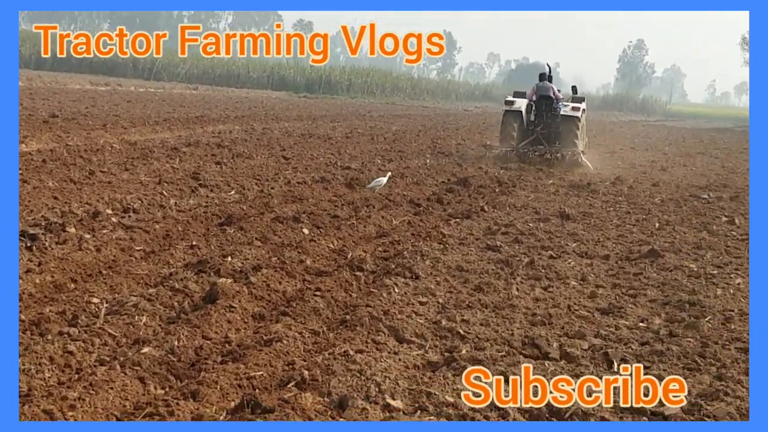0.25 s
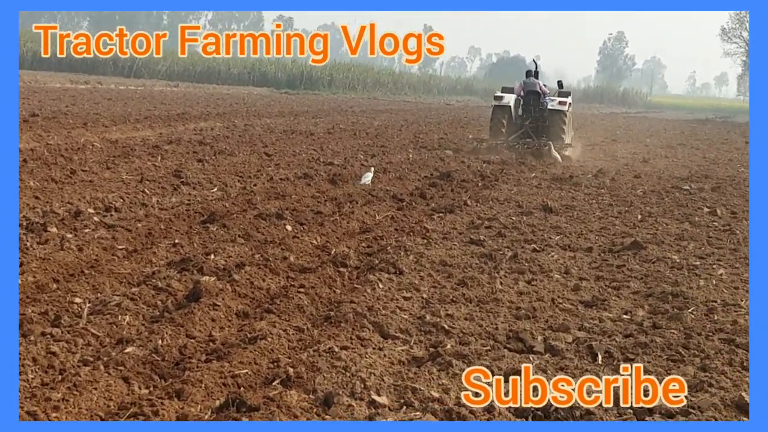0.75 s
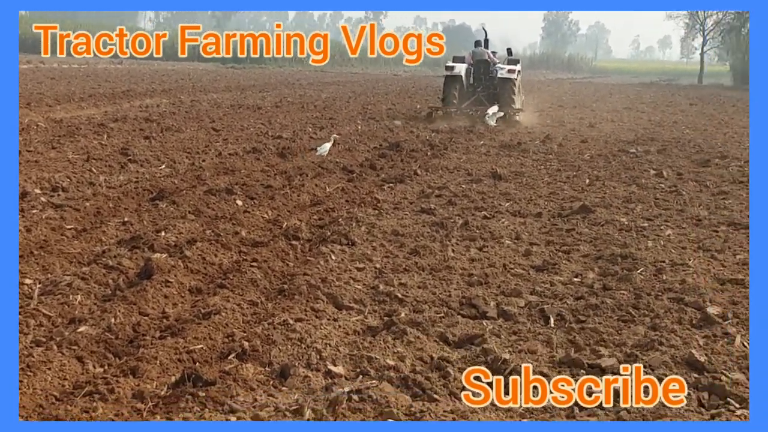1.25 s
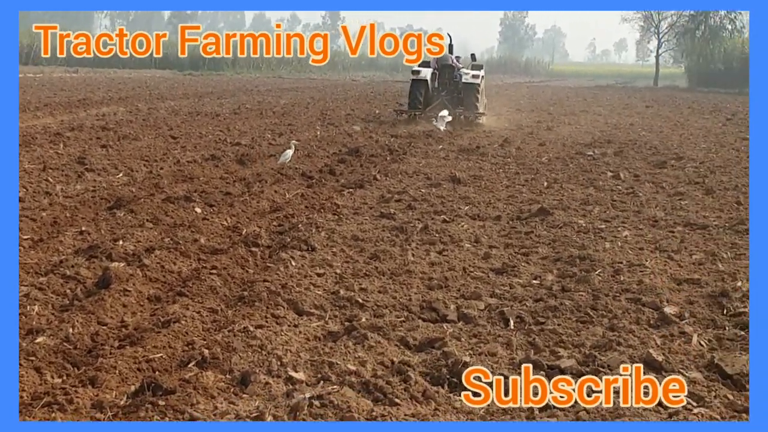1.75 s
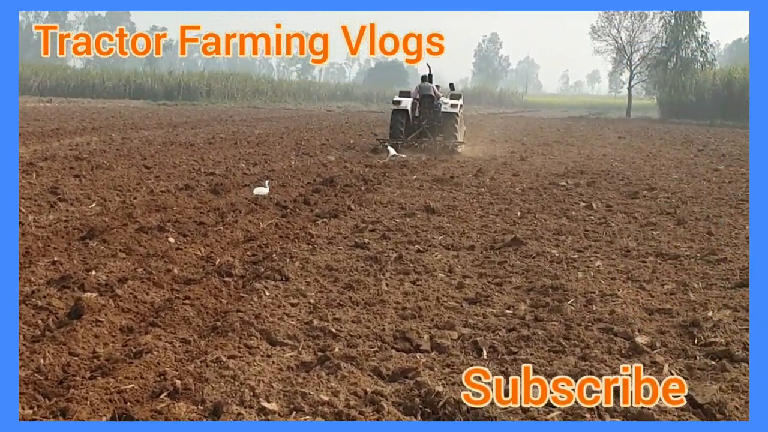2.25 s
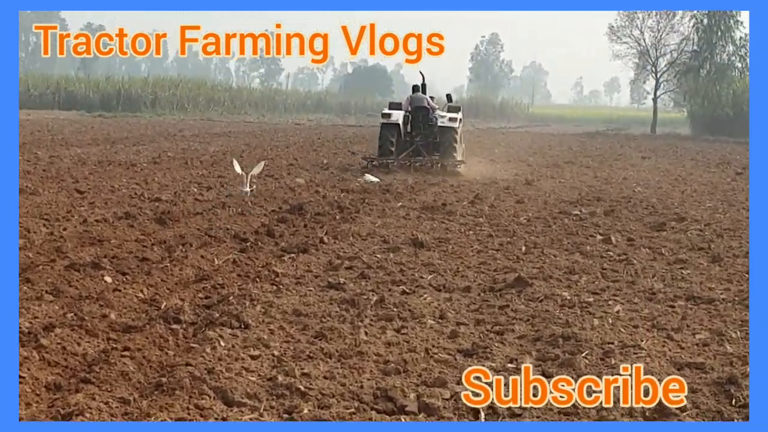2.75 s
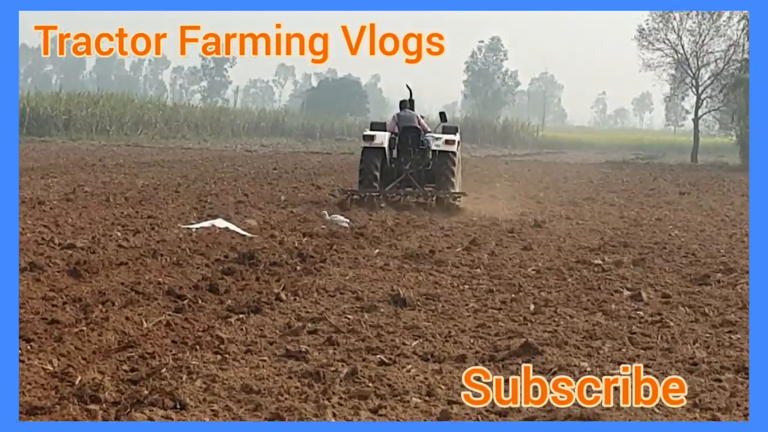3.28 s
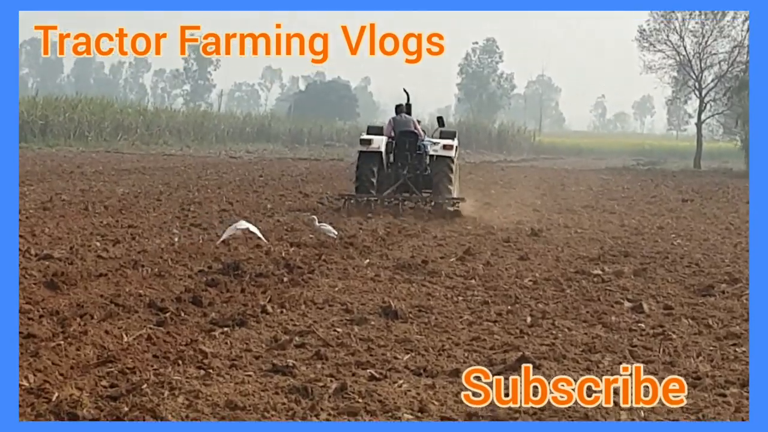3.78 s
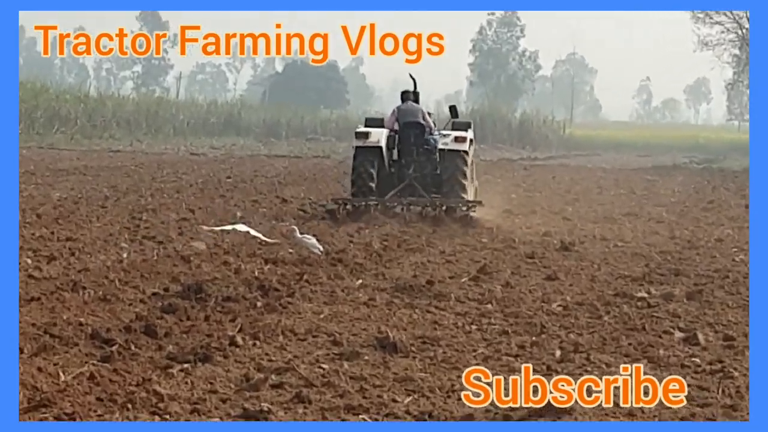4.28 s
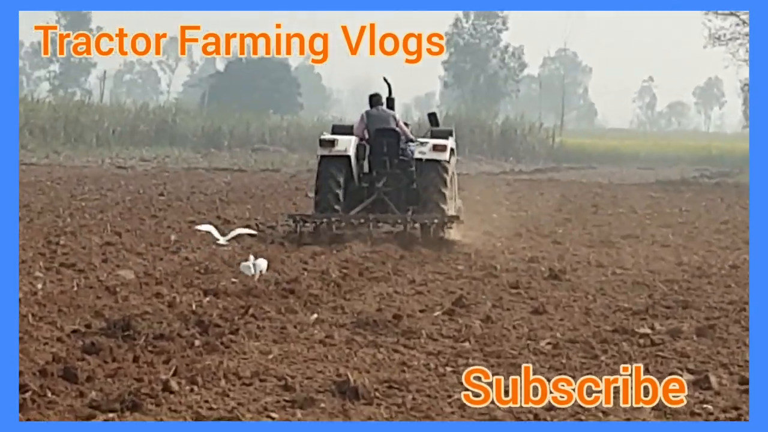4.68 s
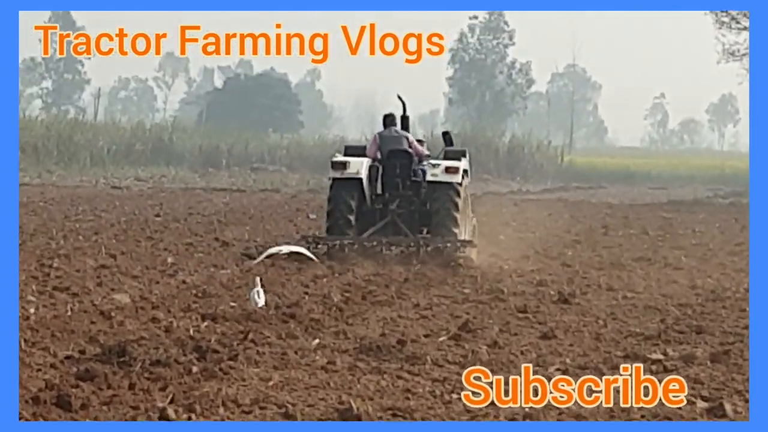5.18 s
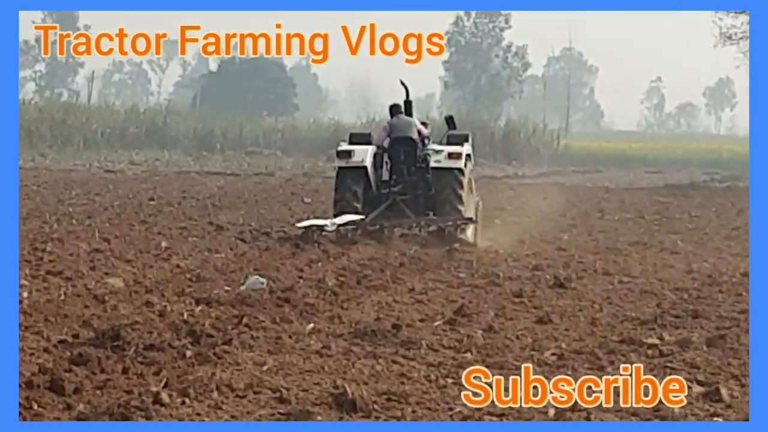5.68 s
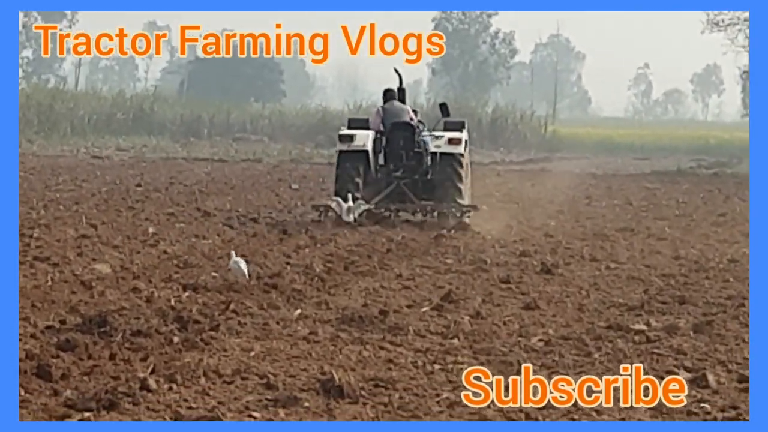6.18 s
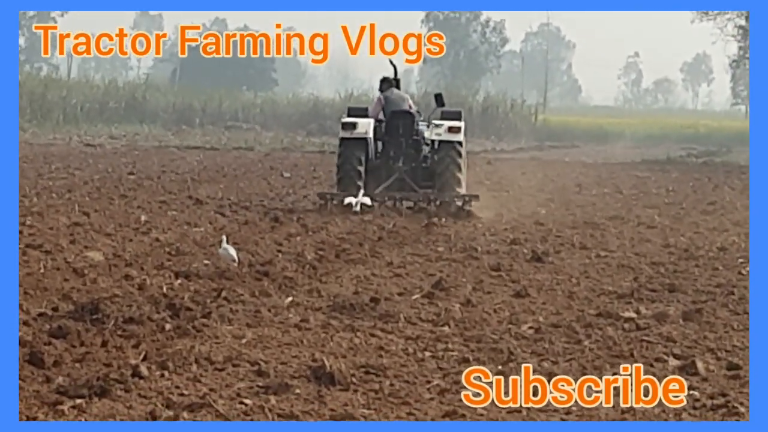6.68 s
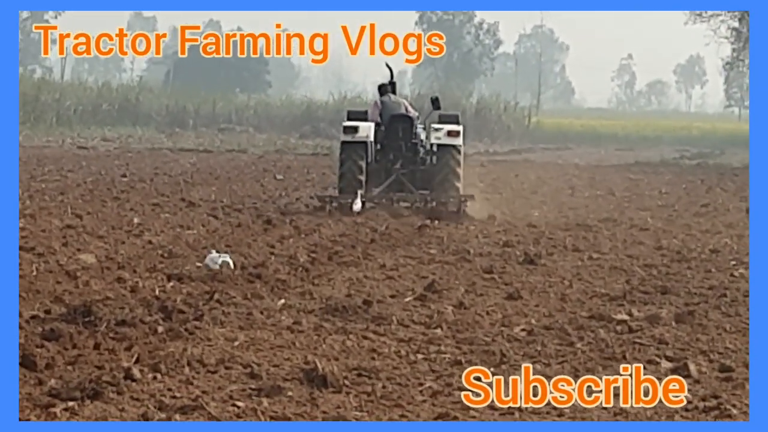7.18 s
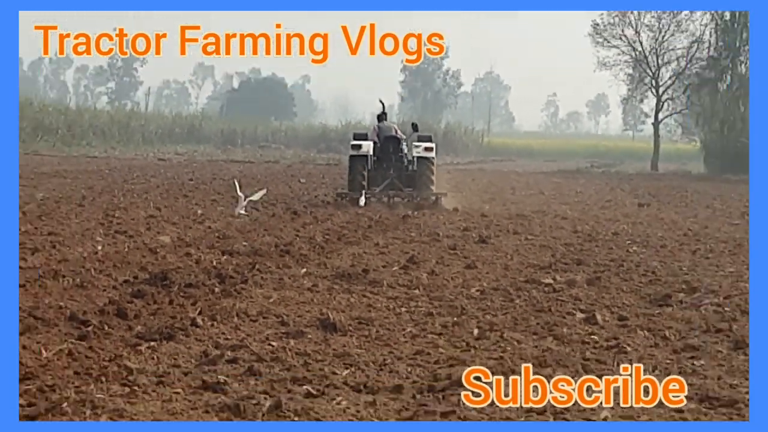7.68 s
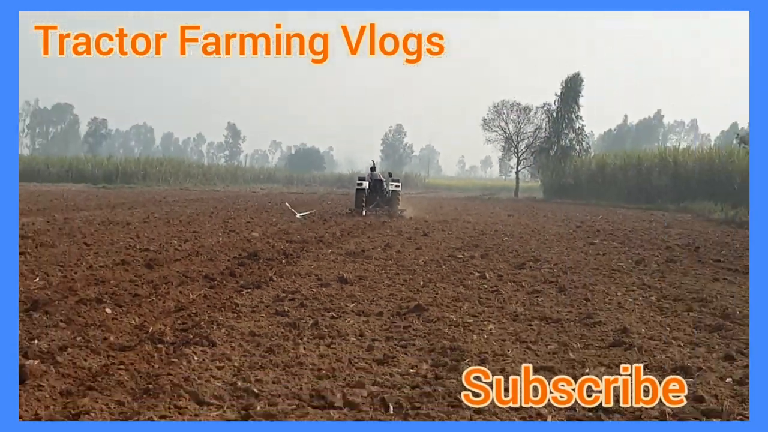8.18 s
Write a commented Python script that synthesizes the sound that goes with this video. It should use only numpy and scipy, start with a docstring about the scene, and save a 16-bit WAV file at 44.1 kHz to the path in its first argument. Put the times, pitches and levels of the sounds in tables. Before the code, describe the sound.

A diesel tractor works at a distance in an open field for about 8.4 seconds, holding nearly constant speed: a low exhaust hum, fast slightly uneven knocking, sheet-metal rattle, airy hiss and a faint wavering gear whine. Soft broadband noise lies over the opening second. Close to the handheld microphone, a very short falling squeak comes at 0.3, then grainy skin rubs; from 0.7 to 1.1 scrapes, ticks and deep case bumps dominate, heaviest around 0.9 to 0.95. Tiny metallic chinks follow near 1.15 to 1.2. Scattered light wind puffs continue until about 4, while the engine clatter becomes clearer and brighter from 3.5. From 4.6 onward low, lumpy buffets with soft diaphragm slaps crowd together, strongest from 7.3 to 8.1, partly covering the steady tractor, which continues to the end.

```python
"""A three-cylinder diesel tractor drags a tiller across an open field, heard from behind.
The exhaust hums on low multiples of the firing rate; each firing adds noise bursts and rings sheet metal.
Gear mesh whines in step with the engine. Close to the hand-held microphone, a hand rubs and bumps the case
early on, small parts tick and chink, a short squeak falls; soft broadband noise fills the opening second.
Wind presses on the port as lumpy low noise, and each puff opens with a slap of the diaphragm."""
import sys
import numpy as np
from scipy import signal
from scipy.fft import rfft, irfft, next_fast_len
from scipy.io import wavfile
from scipy.ndimage import uniform_filter1d

SR = 44100
rng = np.random.default_rng(int(sys.argv[2]) if len(sys.argv) > 2 else 0)


def unload_wav(signal):
    """Save mono or channel-first audio to the path in sys.argv[1] as 16-bit WAV at rate SR, clipped to [-1, 1]."""
    wavfile.write(
        sys.argv[1],
        SR,
        np.round(np.clip(np.atleast_2d(signal).T, -1, 1) * 32767).astype(np.int16),
    )


N = 372204
TIME = np.arange(N) / SR

# puffs of wind at the port, levels before the zone offsets:
# (time [s], buffet level [dB], deep rumble level [dB], flutter level [dB], hold [s])
PUFFS = [(1.185, -34.5, -35.5, -50, 0.021), (1.249, -43, -45, -42, 0.027), (1.304, -34, -33.5, -43, 0.03),
         (1.37, -31, -34, -46, 0.041), (1.463, -34, -44, -46, 0.028), (1.535, -28, -30.5, -42.5, 0.028),
         (1.751, -33, -40, -38.5, 0.013), (1.794, -50, -31.5, -55, 0.012), (1.921, -32, -32.5, -41, 0.047),
         (1.948, -30, -34, -39.5, 0.02), (2.101, -31.5, -34, -44, 0.028), (2.264, -61, -36, -69, 0.07),
         (2.639, -45, -35.5, -50.5, 0.013), (2.941, -47, -39, -62, 0.015), (3.025, -43, -50, -56, 0.014),
         (3.475, -40, -33.5, -62, 0.021), (4.145, -33.5, -52, -46.5, 0.024), (4.52, -48, -29, -42.5, 0.043),
         (4.594, -26, -24.5, -39, 0.023), (4.732, -34.5, -38, -53, 0.049), (4.79, -27.5, -29, -41, 0.023),
         (4.927, -24, -29, -39.5, 0.025), (5.145, -24.5, -27.5, -45, 0.073), (5.302, -35, -37, -63, 0.03),
         (5.45, -33, -26.5, -38, 0.054), (5.491, -21.5, -20.5, -43, 0.012), (5.607, -26.5, -27, -46, 0.013),
         (5.71, -22, -23, -29.5, 0.033), (5.795, -22.5, -44, -46, 0.018), (5.875, -19.5, -31, -30, 0.019),
         (5.953, -25.5, -41, -47, 0.03), (6.02, -20.5, -39, -32.5, 0.056), (6.12, -30.5, -38, -52, 0.03),
         (6.182, -25, -33, -50, 0.045), (6.255, -26.5, -26.5, -38, 0.021),
         (6.328, -24.5, -24.5, -33, 0.026), (6.519, -24.5, -25.5, -38, 0.018),
         (6.575, -28.5, -37, -53, 0.03), (6.64, -22, -26.5, -32, 0.067), (6.733, -25, -34, -38, 0.017),
         (6.871, -26, -29, -36.5, 0.059), (6.927, -22, -26.5, -37, 0.014), (6.965, -32.5, -30, -56, 0.02),
         (7.081, -32, -32.5, -41.5, 0.031), (7.275, -22.5, -29.5, -35.5, 0.025),
         (7.33, -25, -25, -28.5, 0.026), (7.394, -16.5, -40, -25.5, 0.03), (7.434, -22, -25.5, -49, 0.02),
         (7.503, -22, -40, -35.5, 0.09), (7.599, -17, -41, -26, 0.017), (7.681, -21, -26, -31.5, 0.051),
         (7.833, -22.5, -26, -30, 0.022), (7.901, -21, -26, -40.5, 0.09), (7.999, -16.5, -19, -29.5, 0.063),
         (8.096, -28.5, -29, -37, 0.042), (8.256, -52, -45, -63, 0.023), (8.279, -39, -31, -54, 0.016),
         (8.388, -24.5, -28, -27.5, 0.025)]


def amp(db):
    """Decibels to gain."""
    return 10 ** (np.asarray(db) / 20)


def rms_one(x):
    """Scale to unit rms."""
    return x / np.sqrt(np.mean(x ** 2) + 1e-20)


def in_time(rows):
    """Each column of a table after the time, interpolated sample by sample."""
    times, *columns = np.transpose(rows)
    return [np.interp(TIME, times, column) for column in columns]


def coloured(points):
    """Noise of rms 1 shaped by (frequency [Hz], level [dB per Hz]) points."""
    hz, level_db = np.transpose(points)
    size = next_fast_len(N)
    log_hz = np.log(np.maximum(np.arange(size // 2 + 1) * SR / size, 1))
    gain = amp(np.interp(log_hz, np.log(hz), level_db))
    white = rfft(rng.standard_normal(size))
    return rms_one(irfft(white * gain, size)[:N])


def band(x, low_hz, high_hz, order=3):
    """Band-pass."""
    sos = signal.butter(order, [low_hz, high_hz], "band", fs=SR, output="sos")
    return signal.sosfilt(sos, x)


def drift(rate_hz):
    """Slow random wander of rms 1: noise through two equal low-pass poles."""
    step = 20   # samples between the computed points
    pole = np.exp(-2 * np.pi * step * rate_hz / SR)
    white = rng.standard_normal(N // step + 4002)
    slow = signal.lfilter([1], [1, -2 * pole, pole * pole], white)[4000:]   # settled part
    return np.interp(np.arange(N) / step, np.arange(len(slow)), rms_one(slow))


def ring(at_s, gain, hz, t60_s):
    """A decaying sine from each strike, by a two-pole resonator."""
    strikes = np.full(N, 1e-18)
    strikes[np.minimum(np.atleast_1d(at_s) * SR, N - 1).astype(int)] = gain
    radius, angle = amp(-60 / (t60_s * SR)), 2 * np.pi * hz / SR
    poles = [1, -2 * radius * np.cos(angle), radius * radius]
    return signal.lfilter([0, np.sin(angle)], poles, strikes)


def swell(start_s, length_s, edge_s, release=0.87):
    """A straight rise over edge_s, then from length_s an exponential fall of release * edge_s."""
    rise = np.clip((TIME - start_s) / edge_s, 0, 1)
    return rise * np.exp(-np.maximum(TIME - start_s - length_s, 0) / (release * edge_s))


def swings(events):
    """Damped diaphragm swings from (time [s], level [dB], frequency [Hz], t60 [s]), out and in by turns."""
    out, after = np.zeros(N + SR), np.arange(SR // 4) / SR
    for k, (at_s, db, hz, t60_s) in enumerate(events):
        first = int(at_s * SR)
        swing = amp(db - 60 * after / t60_s) * np.sin(2 * np.pi * hz * after)
        out[first:first + len(after)] += (-1) ** k * swing
    return out[:N]


def evened(x, span_s, share):
    """Take a share of the chance swings out of a noise level."""
    level = np.sqrt(uniform_filter1d(x ** 2, int(span_s * SR)) + 1e-12)
    return x / level ** share


def exhaust(firings):
    """Clean low multiples of the firing rate, a little behind the knock."""
    # exhaust hum: (time [s], first order level [dB], second order level [dB])
    hum = [(0, -39, -42), (.6, -40, -39.5), (1.6, -38, -39.5), (2.6, -42.5, -42), (3.2, -39, -42),
           (3.8, -34.5, -35.5), (4.4, -36.5, -38.5), (5.4, -39, -37.5), (6.5, -38.5, -36.5),
           (7.5, -33.5, -41.5), (8.44, -38, -38.5)]
    # higher orders of the hum: (multiple of the firing rate, level to the second order [dB])
    hum_orders = [(3, -24.5), (4, -30), (5, -26.5), (6, -25), (14, -23)]
    first_db, second_db = in_time(hum)
    angle = 2 * np.pi * (firings - .22 + .02 * drift(10))
    first = amp(first_db + 0.49 * drift(26.0)) * np.cos(angle + np.pi / 6)
    second_and_up = np.cos(2 * angle)
    for multiple, level_db in hum_orders:
        second_and_up = second_and_up + amp(3 * drift(5) + level_db) * np.cos(int(multiple) * angle)
    return np.sqrt(2) * (first + amp(second_db + 0.15 * drift(7.8)) * second_and_up)


def clatter(firings):
    """Every firing lets a noise burst through each zone, over a steady churn, and rings the panels."""
    # engine noise as load and the air path change, before the zone offsets:
    # (time [s], clatter [dB], hiss [dB], upper hiss [dB], level in the dip between them [dB])
    engine_noise = [(0, -52.5, -60.5, -58.5, -61.5), (.65, -51.5, -58, -63, -78),
                    (1.02, -45, -68, -61, -54), (1.25, -45.5, -56.5, -59.5, -59),
                    (1.57, -45, -53.5, -61.5, -64), (2.21, -48.5, -59, -61.5, -66),
                    (2.82, -48.5, -55.5, -63, -66.5), (3.2, -47, -51.5, -59, -65),
                    (3.48, -43.5, -49.5, -56, -64.5), (3.8, -42.5, -50.5, -57.5, -66),
                    (4.2, -42.5, -50.5, -56.5, -64.5), (4.9, -43, -49.5, -55.5, -63.5),
                    (5.5, -45, -53, -58.5, -73), (5.9, -45.5, -55.5, -55, -66), (6.3, -44.5, -57, -53, -60),
                    (6.8, -44, -55, -57.5, -59.5), (7.17, -45.5, -58, -54, -65),
                    (7.57, -45.5, -56, -53, -63.5), (8.1, -45, -56.5, -60.5, -59),
                    (8.44, -48.5, -63, -65, -63.5)]
    # highest octave of the engine noise: (time [s], level [dB])
    top_octave = [(0, -68), (.6, -72), (1.15, -65), (1.6, -64), (2.3, -71), (2.7, -72), (3.45, -60.5),
                  (3.83, -68), (4.1, -62.5), (5.1, -61), (5.55, -69.5), (5.7, -64), (6, -72), (6.25, -62.5),
                  (7.03, -66), (7.25, -63), (7.6, -66), (8, -60), (8.44, -66)]
    # bonnet noise, which also drives the panels: (time [s], level [dB])
    bonnet = [(0, -58), (.6, -57.5), (1.15, -55), (2.2, -58), (2.7, -57), (3.5, -49.5), (4.3, -49),
              (4.86, -46.5), (5.3, -52), (6.5, -51), (7.2, -50.5), (7.57, -46.5), (7.9, -50.5), (8.44, -57)]
    # noise zones: (low edge [Hz], high edge [Hz], level to the one it follows [dB],
    # burst over the steady part before each firing's strength [dB], three burst time constants [ms])
    zones = [(215, 1257, -7, -0.5, 7.8), (1107, 1923, -1.53, 4.5, 3.3), (2074, 2724, -0.75, 6.5, 6.1),
             (3010, 4170, -0.5, 6, 1.6), (4320, 4840, -6.5, 6, 3.2), (4890, 6960, -2, 10, 3.9),
             (7520, 8590, 0.5, 15.5, 4.4), (9200, 22000, 1.1, 16, 3.5)]
    # level followed by each zone: (0-3 engine noise columns, 4 highest octave, 5 bonnet)
    zone_follows = [0, 0, 5, 3, 3, 1, 2, 4]
    # spectrum of the engine noise: (frequency [Hz], level [dB per Hz])
    engine_tone = [(260, -75), (450, -11), (661, 1.5), (1060, -5.5), (1330, -1), (2130, -8), (2400, 2),
                   (2700, -16.5), (3040, -15.5), (4030, -34), (4960, -33), (6470, -30), (9650, -31),
                   (12400, -35.5), (15500, -67)]
    # how hard the firings stand out of the churn: (time [s], level [dB])
    knock = [(0, -12), (1.1, -11), (2.5, -6.1), (4.2, -8.5), (5.6, -6.5), (6.2, -2.5), (7.2, -5), (8.44, 0)]
    # uneven knock of the three cylinders: (level [dB] of each)
    cylinder_levels = [1.5, 0.9, -1]
    # sheet-metal panels: (frequency [Hz], level to the bonnet zone [dB], t60 [s])
    panels = [(1666, 10, 0.025), (2060, 2, 0.034), (2430, 5.5, 0.03), (3000, -1, 0.034),
              (3744, -13.5, 0.044), (4460, -10, 0.022)]
    hiss_above_hz, hiss_uneven = 4500, 0.67   # hiss keeps this share of the cylinders' unevenness

    count = np.floor(firings + .18 + 0.017 * drift(30)).astype(int)
    fired = np.flatnonzero(np.diff(np.maximum.accumulate(count))) + 1   # sample of each firing
    chance = rng.standard_normal((len(fired), 1 + len(zones) + len(panels)))
    cylinder_db = np.take(cylinder_levels, count[fired] % 3)
    blow_db = in_time(knock)[0][fired] + 1.4 * chance[:, 0]
    shared_flicker = amp(.9 * drift(7))   # slow random flicker shared by all noise zones
    noise, out = coloured(engine_tone), 0
    followed_db = np.array(in_time(engine_noise) + in_time(top_octave) + in_time(bonnet))
    levels_db = followed_db[zone_follows] + np.array(zones)[:, 2:3]

    for k, (low_hz, high_hz, _, burst_db, decay_ms) in enumerate(zones):
        uneven = hiss_uneven if low_hz > hiss_above_hz else 1
        kicks = np.zeros(N)
        kicks[fired] = amp(burst_db + blow_db + cylinder_db * uneven + 0.99 * chance[:, k + 1])
        pole = np.exp(-3000 / (decay_ms * SR))
        peak_one = np.e ** 2 / 2 * (1 - pole) ** 2   # a burst peaks near the height of its kick
        burst = signal.lfilter([peak_one], np.poly([pole, pole, pole]), kicks)
        flicker = shared_flicker * amp(.9 * drift(9))
        zone_noise = band(noise, low_hz, high_hz) * (1 + burst) * flicker
        out = out + amp(levels_db[k]) * rms_one(zone_noise)

    for k, (hz, panel_db, t60_s) in enumerate(panels):
        strike = amp(levels_db[2][fired] + blow_db + cylinder_db + panel_db)   # zone 2 is the bonnet
        strike = strike * (1 + 1.26 * chance[:, -1 - k])
        out = out + ring(fired / SR + 0.002563, strike, hz, t60_s)
    return out


def whine(firings):
    """Gear teeth meshing in step with the engine: a wavering line with a faint half-pitch partner."""
    # gear whine before its flicker: (time [s], level [dB])
    whine_levels = [(0, -57), (.45, -57.5), (1.1, -58.5), (1.9, -53), (2.3, -60), (3.2, -61.5), (3.8, -52),
                    (4.5, -50.5), (4.8, -49.5), (5, -63), (5.2, -50), (5.8, -57.5), (6.55, -51),
                    (6.8, -59.5), (7.15, -50.5), (7.42, -55), (7.7, -49.5), (8, -56.5), (8.44, -51.5)]
    teeth_per_firing, wobble_hz, flicker_db = 28, 3.73, 1.5
    wobble = np.cumsum(wobble_hz * drift(3.5)) / SR
    angle = 2 * np.pi * (teeth_per_firing * firings + wobble)
    level_db = in_time(whine_levels)[0] + flicker_db * drift(2.8)
    return np.sqrt(2) * amp(level_db) * (np.sin(angle) + amp(-12.0) * np.sin(angle / 2))


def hand():
    """Skin rubs the case in grainy strokes, bumps push the diaphragm, loose parts tick, chink and squeak."""
    # strokes of the hand: (time [s], length [s], level [dB], share of the thin bright rub [0-1])
    rubs = [(0.117, 0.077, -53, 0.3), (0.446, 0.011, -44.5, 0.39), (0.594, 0.15, -48, 0.47),
            (0.696, 0.0091, -34, 0.1), (0.717, 0.042, -24.5, 0.08), (0.749, 0.04, -33, 0.4),
            (0.802, 0.062, -38.5, 0.59), (0.849, 0.016, -23, 0.43), (0.871, 0.012, -28.5, 0.9),
            (0.909, 0.042, -46, 0.58), (0.946, 0.044, -45.5, 0.38)]
    # spectrum of the full rub: (frequency [Hz], level [dB per Hz])
    rub_tone = [(290, -27), (500, -1), (769, -3.5), (914, -3.5), (1530, -13), (2570, -2), (2890, -8.5),
                (4500, -5.5), (7240, -21), (11800, -25), (15500, -48)]
    # spectrum of the thin bright rub: (frequency [Hz], level [dB per Hz])
    thin_rub_tone = [(880, -49), (1500, -12), (2640, -14), (3090, -14), (5560, -12.5), (8290, -3.5),
                     (10300, -20.5), (13800, -22), (15500, -44)]
    # bumps on the case: (time [s], level before the mode levels [dB], extra for the upper modes [dB])
    bumps = [(0.697, -33.5, 12), (0.722, -15, -12), (0.758, -18, 10.5), (.857, -5, 0), (0.884, -4, -16),
             (.904, -2, 2), (0.925, 5.5, -13), (0.95, -8.5, 3), (1.016, -6, -38), (1.069, -23, 0),
             (1.093, -8.5, -4.5)]
    # swings of the bumped case: (frequency [Hz], level [dB], t60 [s])
    case_modes = [(61, 5.5, 0.059), (133, 7, 0.012), (390, -13, 0.0065)]
    # small clicks: (time [s], level [dB])
    tick_rows = [(0.626, -37), (0.638, -37), (0.9089, -24), (0.929, -32), (1.035, -38), (1.07, -30.5),
                 (1.0889, -47)]
    # strikes of a small metal part, before the mode levels: (time [s], level [dB])
    chink_rows = [(1.137, -36), (1.174, -53), (1.1967, -37.5)]
    # ringing of the metal part: (frequency [Hz], level [dB], t60 [s])
    chink_modes = [(5787, -19, 0.17), (6245, -7, 0.074), (6600, 0, 0.059), (7740, -1, 0.035),
                   (7600, -21, 0.25), (9300, -10, 0.046), (11040, -21, 0.035)]
    # one short falling squeak: (time [s], length [s], starting pitch [Hz], level [dB])
    squeak_row = (.308, .017, 2090, -41)

    full, thin = coloured(rub_tone), coloured(thin_rub_tone)
    grain = amp(4 * drift(150))
    strokes = 0
    for start_s, length_s, db, share in rubs:
        skin = (1 - share) * full + share * thin
        strokes = strokes + amp(db) * swell(start_s, length_s, 0.0082) * grain * skin

    pushes = 0
    for k, (hz, mode_db, t60_s) in enumerate(case_modes):
        events = [(at_s, db + mode_db + upper_db * (k > 0), hz, t60_s) for at_s, db, upper_db in bumps]
        pushes = pushes + swings(events)

    at_s, tick_db = np.transpose(tick_rows)
    ticks = ring(at_s, amp(tick_db), 3650, 0.0034) + ring(at_s, amp(tick_db - 1), 6700, 0.0022)

    at_s, chink_db = np.transpose(chink_rows)
    chinks = 0
    for hz, mode_db, t60_s in chink_modes:
        strike_db = chink_db + mode_db - 4 + rng.normal(0, 2.5, len(at_s))
        chinks = chinks + ring(at_s, amp(strike_db), hz, t60_s)

    start_s, length_s, hz, db = squeak_row
    after = TIME - start_s
    angle = 2 * np.pi * hz * after * (1 - 1.2 * np.clip(after, 0, .05))
    squeak = amp(db) * swell(start_s, length_s, .003) * (np.sin(angle) + amp(-17) * np.sin(3 * angle))
    return strokes + band(pushes, 51, 2100, order=1) + ticks + chinks + squeak


def opening_noise():
    """Soft broadband noise in the opening second, flickering slightly, then fading out."""
    # opening noise before its flicker: (time [s], level [dB])
    opening_levels = [(0.0, -49.5), (0.666, -50.5), (0.8, -65), (0.86, -43), (1.3, -68), (1.6, -90)]
    # spectrum of the opening noise: (frequency [Hz], level [dB per Hz])
    opening_tone = [(200, -25), (300, 0.5), (500, 1), (700, -13), (791, -30), (950, 1.5), (1390, 2.5),
                    (1510, -25), (1860, -20), (2080, -2.5), (3150, -18), (3830, -11), (7050, -27),
                    (8370, -21), (13000, -43)]
    flicker_db = 1.5
    level_db = in_time(opening_levels)[0] + flicker_db * drift(10)
    return amp(level_db) * coloured(opening_tone)


def wind():
    """Eddies press on the port in shared lumps: breeze, puffs and the shaking grip add their power."""
    # steady wind on the port, before the zone offsets: (time [s], level [dB])
    breeze = [(0, -59.5), (1.1, -73), (1.17, -48), (2.63, -55.5), (3.74, -56.5), (3.98, -41), (4.49, -60),
              (4.71, -41), (5.22, -49.5), (5.93, -38.5), (6.19, -37), (6.37, -47.5), (6.88, -46),
              (7.18, -58), (7.53, -34.5), (8.44, -45)]
    # the moving hand shakes the case: (time [s], deep rumble [dB], buffet [dB], flutter [dB])
    grip = [(0.67, -35, -58, -52), (0.712, -25, -29.5, -36), (0.764, -28, -24, -31), (0.818, -53, -45, -33),
            (0.868, -16, -12, -28), (0.93, -6, -12.5, -10.5), (1.0, -27, -36, -52),
            (1.11, -14.5, -25.5, -23), (1.168, -56, -49, -61), (1.19, -40, -33, -31)]
    # wind zones, deep rumble to flutter: (low edge [Hz], high edge [Hz], lumpiness [dB],
    # level to the breeze [dB], level to the puff column [dB])
    gusts = [(33.8, 106.4, 2, 10, 1), (112, 214.5, 4, 3.5, -3.5), (221.5, 705, 5.5, -6, 3.5)]
    attack_s, release_s = 0.0065, 0.024   # of a puff's amplitude

    noise = coloured([(20, 1.0), (120, 11.5), (280, -2), (450, -17), (900, -35), (3000, -39)])
    lumps, out = drift(85.5), 0
    [breeze_db] = in_time(breeze)
    held = (TIME > grip[0][0]) & (TIME < grip[-1][0])
    puff_powers = np.array([swell(at_s, hold_s + attack_s, attack_s, release_s / attack_s) ** 2
                            for at_s, *_, hold_s in PUFFS])
    _, buffet_db, deep_db, flutter_db, _ = np.transpose(PUFFS)
    for puff_db, grip_db, zone in zip([deep_db, buffet_db, flutter_db], in_time(grip), gusts):
        low_hz, high_hz, lump_db, calm_db, share_db = zone
        power = amp(breeze_db + calm_db) ** 2
        power = power + amp(puff_db + share_db) ** 2 @ puff_powers
        power = power + held * amp(grip_db) ** 2
        eddies = evened(band(noise, low_hz, high_hz, order=2), 0.0349, 0.9)
        out = out + np.sqrt(power) * rms_one(eddies * amp(lump_db * lumps))
    return out


def slaps():
    """Each puff opens by swinging the diaphragm in a quickly damped slap of random pitch."""
    lag_s, over_puff_db = 0.00822, 10   # to the puff's start and buffet level
    low_hz, high_hz, cycles = 89, 177, 3.54   # pitch range, and cycles in a 60 dB decay
    pitch_hz = low_hz * (high_hz / low_hz) ** rng.random(len(PUFFS))
    events = [(at_s + lag_s, buffet_db + over_puff_db, hz, cycles / hz)
              for (at_s, buffet_db, *_), hz in zip(PUFFS, pitch_hz)]
    return band(swings(events), 63, 630, order=1)


def scene():
    """Tractor far off, hand and wind close to the microphone."""
    # engine speed: (time [s], firing rate [firings per s])
    speed = [(0.0, 48.92), (0.22, 48.46), (0.45, 49.41), (0.95, 47.98), (1.5, 47.67), (1.85, 48.32),
             (2.1, 48.47), (2.4, 49.13), (2.7, 47.94), (3.3, 48.24), (3.55, 48.53), (3.95, 48.67),
             (4.28, 48.29), (4.45, 48.39), (4.9, 48.46), (5.15, 49.53), (5.5, 48.47), (5.65, 48.5),
             (5.95, 47.74), (6.55, 48.64), (6.75, 48.81), (7.05, 49.08), (7.45, 47.62), (7.7, 48.41),
             (8.0, 48.08), (8.28, 49.31), (8.44, 48.49)]
    firings = -.15 + np.cumsum(in_time(speed)[0]) / SR   # running count, from just before a firing
    tractor = exhaust(firings) + clatter(firings) + whine(firings)
    return (tractor + hand() + opening_noise() + wind() + slaps())[None, :]


def record(dry):
    """The microphone chain cuts the deepest bass, clips at full scale, then cuts the top."""
    bass_cut = signal.butter(3, 36, "high", fs=SR, output="sos")
    clipped = np.clip(signal.sosfilt(bass_cut, dry), -1, 1)
    top_cut = signal.cheby2(12, 70, 15900, fs=SR, output="sos")   # 70 dB down from 15.9 kHz
    return signal.sosfilt(top_cut, clipped)


dry = scene()
out = record(dry)
unload_wav(out)
```